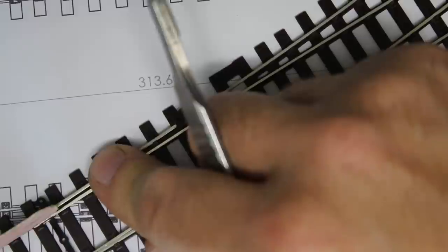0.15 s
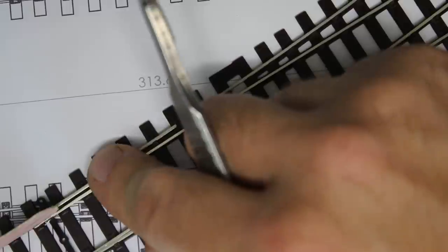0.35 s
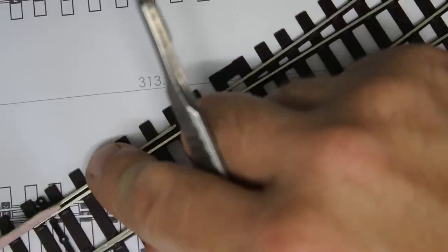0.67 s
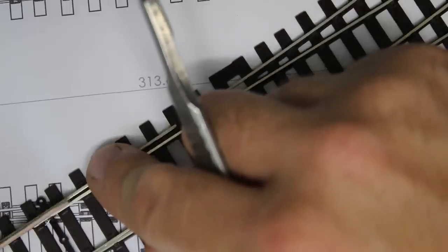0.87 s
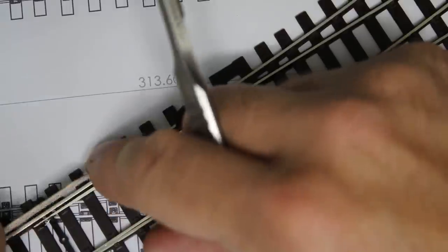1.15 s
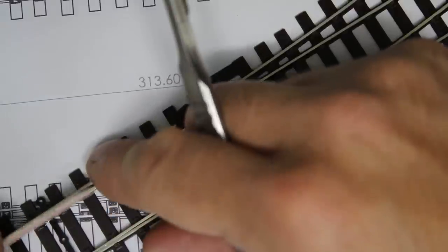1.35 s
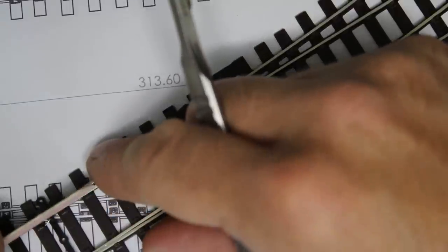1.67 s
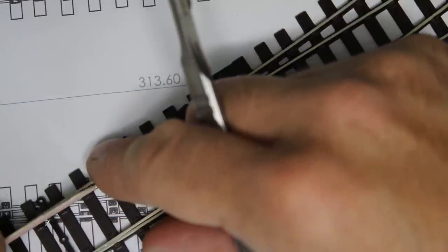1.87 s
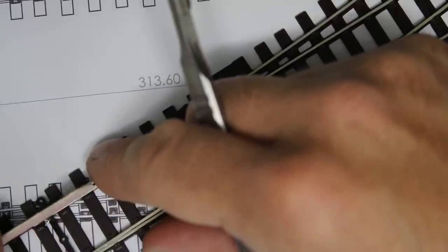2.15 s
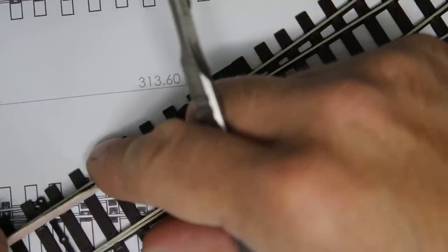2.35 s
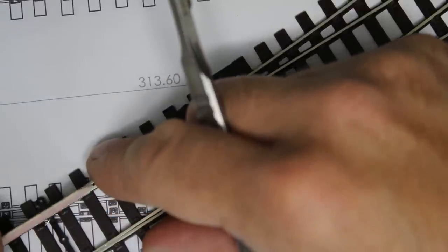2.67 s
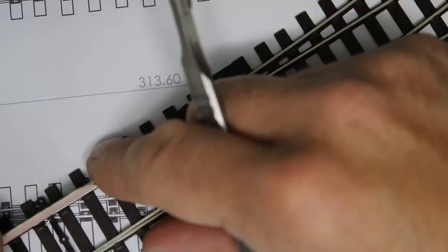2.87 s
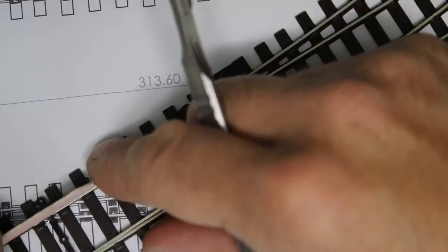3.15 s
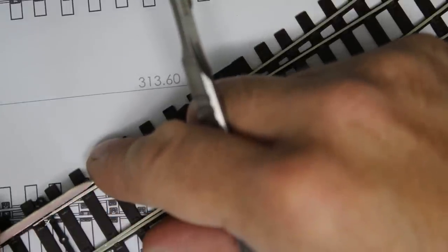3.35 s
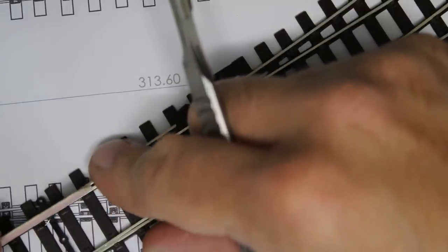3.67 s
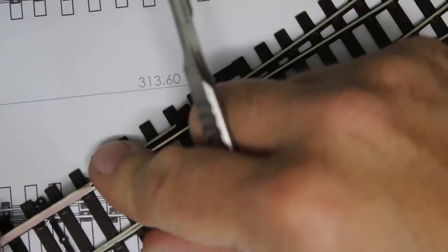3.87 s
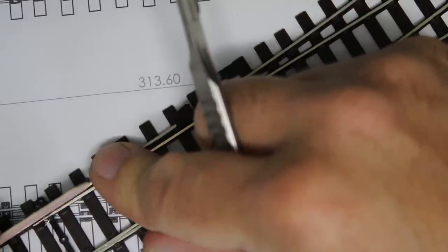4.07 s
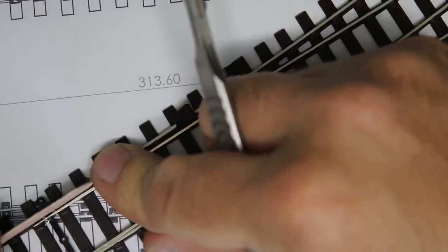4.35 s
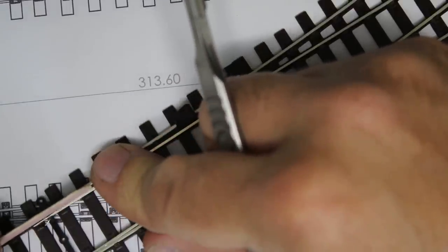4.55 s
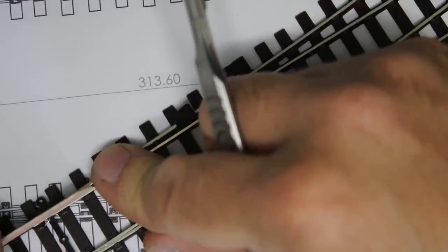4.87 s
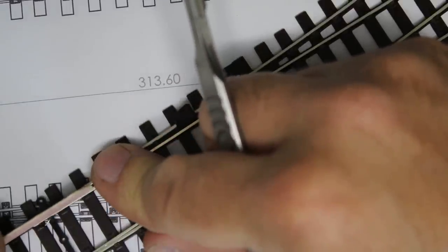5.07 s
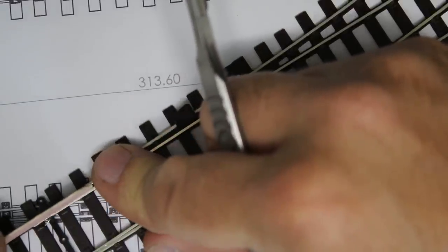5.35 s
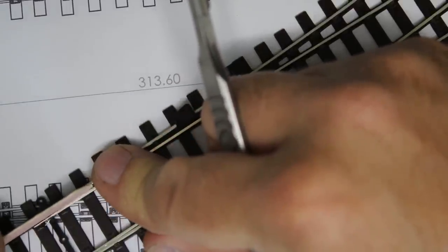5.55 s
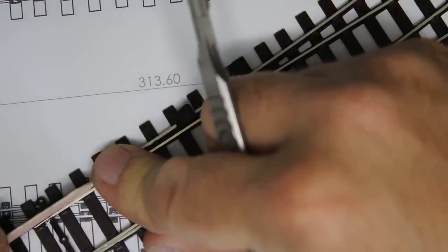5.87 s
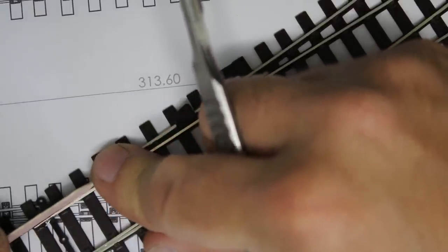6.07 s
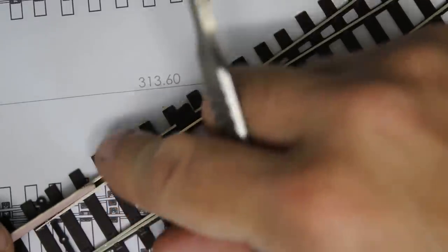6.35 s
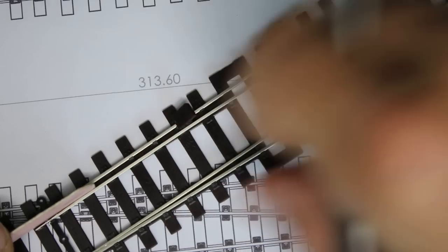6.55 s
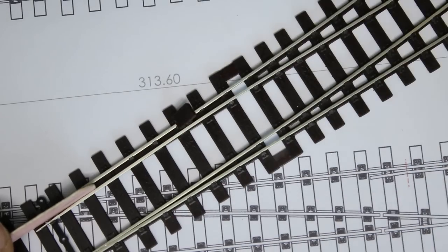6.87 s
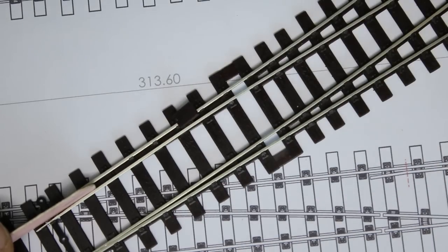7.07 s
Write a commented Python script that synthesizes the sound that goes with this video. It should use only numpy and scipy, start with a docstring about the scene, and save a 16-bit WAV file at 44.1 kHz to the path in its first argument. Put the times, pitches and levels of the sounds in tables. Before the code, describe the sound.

Quiet close-up handiwork: irregular tiny ticks on plastic and metal rails over soft room murmur, ending with a loud, bright bounce of dropped steel tweezers.

```python
"""Model track under tweezers

Fingers and steel tweezers press small parts onto a model track on a wooden board, close to a mono microphone.
Contacts are gritty pushes that ring the modes of chairs, sleepers, board and rails; the heaviest also thud in
the bench, and fingertips rub as filtered grainy noise. At the end the dropped tweezers bounce and ring.
A quiet room murmurs as coloured noise with a low wavering hum, under a little electronic hiss."""
import sys
import numpy as np
from scipy import signal
from scipy.fft import rfft, irfft
from scipy.io import wavfile
from scipy.ndimage import uniform_filter1d

SR = 44100
rng = np.random.default_rng(int(sys.argv[2]) if len(sys.argv) > 2 else 0)


def materialize(psi):
    """Save the field psi as 16-bit PCM at rate SR to the path in sys.argv[1].

    A 1-D psi becomes a single channel; in a 2-D psi each row is a channel.
    """
    bounded = np.clip(np.atleast_2d(psi).T, -1, 1)
    quanta = np.round(bounded * 32767).astype(np.int16)
    wavfile.write(sys.argv[1], SR, quanta)


def volts(x):
    """Linear amplitude factor 10**(x/20) for a level x in dB, scalar or array-like."""
    e = np.asarray(x, float) / 20
    return 10 ** e


N = 317961  # samples


def curve(rows):
    """Rows (t/s, value) joined by straight lines."""
    s, value = np.transpose(rows)
    return np.interp(np.arange(N) / SR, s, value)


def coloured(points):
    """Noise of rms 1 with the spectrum given as (f/Hz, level/dB), joined over log frequency."""
    hz, db = np.transpose(points)
    bins = np.arange(N // 2 + 1) * SR / N + 1
    gain = volts(np.interp(np.log(bins), np.log(hz), db))
    noise = irfft(rfft(rng.standard_normal(N)) * gain, N)
    return noise / noise.std()


def air():
    """Room murmur as broadband noise, plus a hum that wavers because it is a narrow band of noise."""
    # spectrum of the murmur: f/Hz, relative level/dB
    murmur_colour = [(14, -30), (26, -1), (32, 2), (40, 2), (68, 0.5), (163, -10), (277, -3), (499, -11),
                     (590, -7), (678, -10), (873, -4.5), (1400, -15.5), (3530, -20.5), (4420, -26),
                     (7520, -31), (14700, -31.5), (16000, -38.5)]
    # loudness of the murmur: t/s, level/dB
    murmur_level = [(0.0, -47), (7.21, -48.5)]
    # loudness of the hum: t/s, level/dB
    hum_level = [(0.0, -56.5), (1.32, -50.5), (1.51, -60), (4.03, -55.5), (7.21, -57)]
    hum_hz, width_hz = 74.7, 10.6
    murmur = coloured(murmur_colour) * volts(curve(murmur_level))
    hum = coloured([(hum_hz - 2 * width_hz, -40), (hum_hz - width_hz / 2, -3), (hum_hz, 0),
                    (hum_hz + width_hz / 2, -3), (hum_hz + 2 * width_hz, -80)])
    return murmur + hum * volts(curve(hum_level))


def walk(rate):
    """Random levels, rate of them a second, joined by slopes; spread near 1."""
    k = int(SR / rate)
    held = np.repeat(rng.standard_normal(N // k + 1), k)
    return uniform_filter1d(held, k)[:N] * 1.2


def add(out, s, sound):
    """Mix a sound in at time s."""
    i = int(s * SR)
    out[i:i + len(sound)] += sound


def rubbing():
    """Skin catches and slips: band-passed grainy noise in strokes that swell a little faster than they fade."""
    # fingertips slide over track, paper and bench: start t/s, end t/s, level/dB, centre f/Hz
    strokes = [(0.433, 0.634, -57.5, 3500), (0.731, 0.838, -53, 3980), (0.858, 0.936, -49.5, 5000),
               (0.927, 1.146, -50, 5100), (1.406, 1.48, -50.5, 3440), (1.507, 1.603, -54, 3500),
               (1.603, 1.727, -63, 5000), (2.302, 2.332, -47, 3000), (2.602, 2.627, -38, 2520),
               (4.023, 4.195, -44.5, 437), (4.236, 4.59, -54, 470), (5.638, 5.697, -56, 3500),
               (5.925, 5.986, -60, 5000), (6.257, 6.34, -47, 3000), (6.347, 6.445, -54.5, 4000),
               (6.605, 6.676, -42.5, 1270)]
    # spectrum of skin noise ahead of the band-pass: f/Hz, relative level/dB
    skin_colour = [(250, 22), (900, 14.5), (2000, 4), (3600, -1.5), (5500, -4), (15000, -23.5)]
    out = np.zeros(N)
    catch_db = 0.82 * walk(65) + 3.5 * walk(300)
    grain = volts(catch_db) * coloured(skin_colour)
    for start, end, db, hz in strokes:
        band = signal.butter(2, [hz / 2, min(hz * 2.8, SR / 3)], "bandpass", fs=SR, output="sos")
        piece = signal.sosfilt(band, grain[int(start * SR):int(end * SR)])
        along = np.linspace(0, 1, len(piece))
        swell = np.sin(np.pi * along ** 0.76) ** 0.63
        add(out, start, volts(db) * piece / piece.std() * swell)
    return out


def ring(modes, scatter_db, spread, count):
    """Answer to one push: each mode is a cluster of count close neighbours that every contact weights anew."""
    hz, db, t60 = np.repeat(np.transpose(modes), count, axis=1)[:, :, None]
    size, shift = rng.standard_normal((2, len(hz), 1))
    t60 = np.clip(t60, .002, .3)
    t = np.arange(int(t60.max() * SR)) / SR
    # each cluster starts in step, but against the next one, so the blow is sharp
    sign = (-1) ** (np.arange(len(hz))[:, None] // count)
    level = volts(db + scatter_db * size)
    fade = np.exp(-np.log(1000) * t / t60)
    wave = np.sin(2 * np.pi * hz * (1 + spread * shift) * t)
    return np.sum(sign * level * fade * wave, axis=0)


def contact_push(db, tick):
    """Force of one contact: a graze, a firm tick and a dying chatter of micro-bounces, its energy set by db."""
    t = np.arange(SR // 16) / SR
    firm = SR // 1000  # the tick comes 1 ms in
    chatter_ms = 2.05
    age = 1000 * np.abs(t - t[firm]) / chatter_ms
    grit = rng.standard_normal(len(t))
    push = grit * np.abs(grit) * (np.exp(-age) + 0.48 * np.exp(-age / 6.76))
    push[:firm] *= .3  # graze
    push[firm] = tick
    return push * volts(db) / np.sqrt(np.sum(push ** 2))


def ring_track(out, s, push, board_db, rail_db):
    """One push rings chairs, sleepers, board and rails together, each by its share, with a bare crack on top."""
    # modes of the small chairs that hold the rails: f/Hz, level/dB, t60/s
    chairs = [(2664, -16, 0.0091), (3440, -6, 0.0066), (3620, -8, 0.017), (4220, -19, 0.0087)]
    # modes of the sleepers: f/Hz, level/dB, t60/s
    sleepers = [(1470, -1.75, 0.028), (1674, 1.16, 0.0079), (2080, -1.5, 0.01)]
    # modes of the wooden board: f/Hz, level/dB, t60/s
    board = [(571, -7, 0.056), (759, -3, 0.059), (872, 1, 0.056), (1014, -3, 0.059)]
    # modes of the rails: f/Hz, level/dB, t60/s
    rails = [(5000, 4.5, 0.0084), (5700, 1, 0.014), (6410, 1, 0.0065), (8140, -0.5, 0.003),
             (9220, -9, 0.019), (11040, -8.5, 0.0063), (13700, -4, 0.0035)]
    # what reaches the board passes through the sleepers, so their share follows it
    sleeper_db = -2.5 + 0.58 * board_db
    crack_db = -12  # against the rail share
    parts = [ring(chairs, 0.97, 0.038, count=5),
             volts(sleeper_db) * ring(sleepers, 0.53, 0.079, count=6),
             volts(board_db) * ring(board, 0.98, 0.077, count=3),
             volts(rail_db) * ring(rails, 0.35, 0.043, count=3),
             volts(rail_db + crack_db) * np.array([1., -1.])]
    for part in parts:
        add(out, s, signal.fftconvolve(push, part))


def taps():
    """Guided tips press on the track: each contact pushes it once and the hand keeps the steel from ringing."""
    # contacts: t/s, chair level/dB, board share level/dB, rail share level/dB
    touches = [(0.7542, -39.5, -13, -16.5), (0.8706, -40.5, -15, -12), (1.0004, -41.5, -11, -11),
               (1.1847, -41, -14, -18), (1.2536, -42, 0, -12), (1.2754, -30.5, -26, -13.5),
               (1.2805, -26, -21.5, -22), (1.2994, -42, -6, -17), (1.3354, -23, -22, -20.5),
               (1.3444, -45, 2, -9), (1.3516, -41.5, 13.5, -19), (1.5364, -37.5, -28, -29),
               (1.8352, -44.5, -6, -27), (2.0018, -36, -12, -15), (2.103, -58, 7, -15),
               (2.139, -39.5, -12, -21), (2.159, -37, -11, -20), (2.2402, -28.5, -25, -22),
               (2.3052, -39, -11, -19), (2.3256, -42.5, -4.5, -18), (2.3725, -32, -17, -12),
               (2.4016, -40, -1.5, -13), (2.4633, -34, -11.5, -10), (2.4774, -35, -18, -22),
               (2.4934, -40, -20, -25), (2.61, -30.5, -11, -18.5), (3.0555, -43.5, -16, -19),
               (3.1223, -42.5, -14, -22), (3.2151, -24, -21, -17.5), (3.2999, -34, -14, -14),
               (3.5055, -38.5, -14, -14), (3.7346, -35.5, -15, -16), (3.8322, -49.5, -18, -6.5),
               (4.0452, -42.5, -9, -13), (4.3276, -46.5, -15, -2), (4.5291, -33.5, -25, -20),
               (4.951, -44, -16, -19), (5.2925, -27.5, -14, -14), (5.3126, -35.5, -3, -8.5),
               (5.5555, -47.5, -8, -10), (5.654, -32, -13, -10.5), (5.9, -45, -13, -8),
               (5.9204, -23, -20, -13), (5.9242, -18, -20, -10.5), (5.9314, -33, -30, -2),
               (6.0046, -39.5, -24, -13.5), (6.3041, -26.5, -6.5, -13.5), (6.3664, -46, 0, -11),
               (6.4312, -32, -2.5, -19), (6.4441, -49.5, 18.5, -16), (6.6129, -43, -3, -20),
               (6.6488, -30.5, -15, -21)]
    out = np.zeros(N + SR)
    for s, db, board_db, rail_db in touches:
        ring_track(out, s, contact_push(db, tick=26.), board_db, rail_db)
    return out[:N]


def thuds():
    """The weight of hand or tool: a soft push of about 1.2 ms rings only the low modes of the bench."""
    # thuds into the bench: t/s, level/dB
    blows = [(1.254, -40), (1.351, -31.5), (2.479, -42.5), (5.925, -35.5), (6.007, -40.5), (6.306, -29),
             (6.432, -23.5), (6.445, -26), (6.971, -34), (7.005, -38), (7.011, -22.5)]
    # modes of the bench: f/Hz, level/dB, t60/s
    bench = [(117, -13.5, 0.14), (185.3, -7, 0.14), (229, -15.5, 0.21), (350, -7.5, 0.031),
             (466, -9.5, 0.037), (616, -9, 0.04)]
    out = np.zeros(N + SR)
    push = np.hanning(SR // 800)
    push /= push.sum()
    for s, db in blows:
        add(out, s, volts(db) * np.convolve(push, ring(bench, 0.89, 0.019, count=2)))
    return out[:N]


def dropped_tweezers():
    """Falling steel strikes the track and, out of the hand, rings on until it lands again."""
    # bounces: t/s, chair level/dB, board share level/dB, rail share level/dB, steel pitch favoured f/Hz
    bounces = [(6.9687, -6.5, -13, -27, 7600), (7.0014, -3, -16.5, -9.5, 8940),
               (7.0074, -7, -21, -23, 9000), (7.0134, -21.5, -6, -20, 9000),
               (7.0314, -3.5, -27, -14.5, 11600), (7.0532, -19, -16, -18, 5300)]
    # modes of the free tweezers: f/Hz, level/dB, t60/s (held to 0.3 s at most)
    tweezers = [(5300, -30, .08), (7671, -28, 0.31), (8950, -15.5, 0.074), (11600, -25, 0.12)]
    tweezers_db, off_pitch_db_per_octave, landing_damp_s = -5, -50, 0.0098
    out = np.zeros(N + SR)
    for s, db, board_db, rail_db, favoured_hz in bounces:
        push = contact_push(db, tick=40.)  # lands harder than a guided tip
        ring_track(out, s, push, board_db, rail_db)
        flight = min([later[0] - s for later in bounces if later[0] > s], default=.2)
        modes = [(hz, mode_db + off_pitch_db_per_octave * abs(np.log2(hz / favoured_hz)), t60)
                 for hz, mode_db, t60 in tweezers]
        steel = ring(modes, 1.8, 0.006, count=3)
        landed = np.maximum(np.arange(len(steel)) / SR - flight, 0)
        steel *= np.exp(-landed / landing_damp_s)
        add(out, s, signal.fftconvolve(push, volts(tweezers_db) * steel))
    return out[:N]


def room(x):
    """A small furnished room: dense noise echoes, duller as they fade because the bright part dies faster."""
    t60_s, level_db, dull_hz = 0.47, -17, 6940
    t = np.arange(SR // 2) / SR
    noise = rng.standard_normal(len(t)) * np.clip(t / 0.0034, 0, 1)
    dull = signal.lfilter(*signal.butter(1, dull_hz, fs=SR), noise)
    tail = dull * np.exp(-np.log(1000) * t / t60_s)
    tail += 0.73 * noise * np.exp(-np.log(1000) * t / (.5 * t60_s))
    return volts(level_db) * signal.fftconvolve(x, tail / np.sqrt(np.sum(tail ** 2)))[:N]


def scene():
    """All sources reach one microphone, heard alike on both channels."""
    near = rubbing() + taps() + thuds() + dropped_tweezers()
    near = signal.sosfilt(signal.butter(2, 110, "highpass", fs=SR, output="sos"), near)
    return np.tile(near + room(near) + air(), (2, 1))


def top_cut(x):
    """Nothing passes above the cut-off."""
    return signal.sosfilt(signal.butter(12, 16400, fs=SR, output="sos"), x)


def record(dry):
    """A little hiss is added, and a faint coloured noise in opposite phase sets the two channels slightly
    apart; the loudest peaks clip."""
    # spectrum of the hiss that differs between channels: f/Hz, relative level/dB
    side_colour = [(12, -59), (20, -8), (172, -6.5), (2260, -10), (4670, -6.5), (16000, -7.5)]
    hiss_db, side_hiss_db = -63, -62.5
    hiss = volts(hiss_db) * rng.standard_normal(N)
    side_hiss = volts(side_hiss_db) * coloured(side_colour) * np.array([[1], [-1]])
    mix = np.clip(dry + hiss + side_hiss, -1, 1)
    return top_cut(mix)


dry = scene()
out = record(dry)
materialize(out)
```